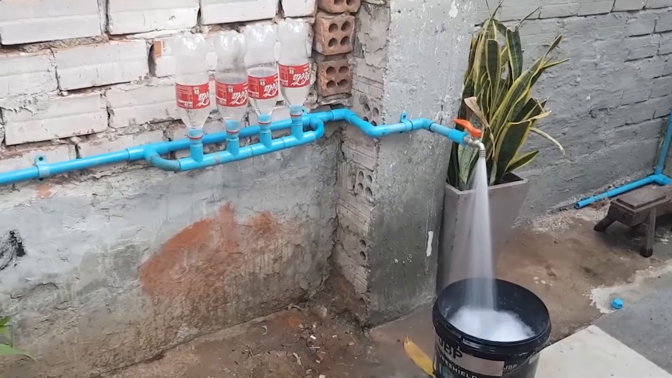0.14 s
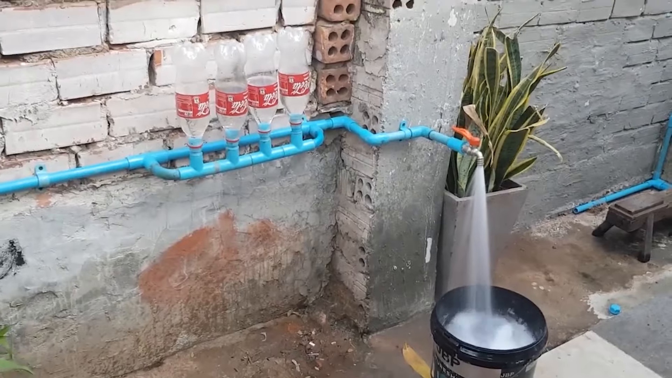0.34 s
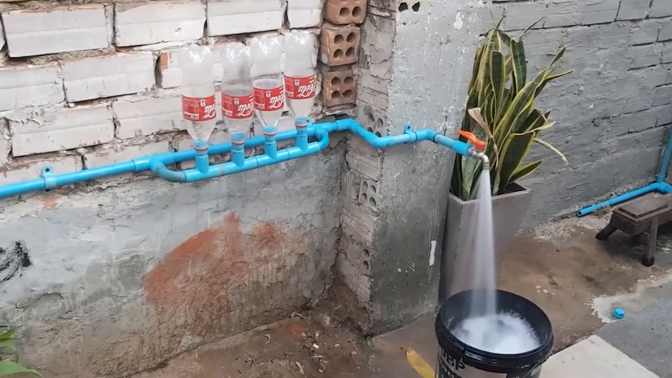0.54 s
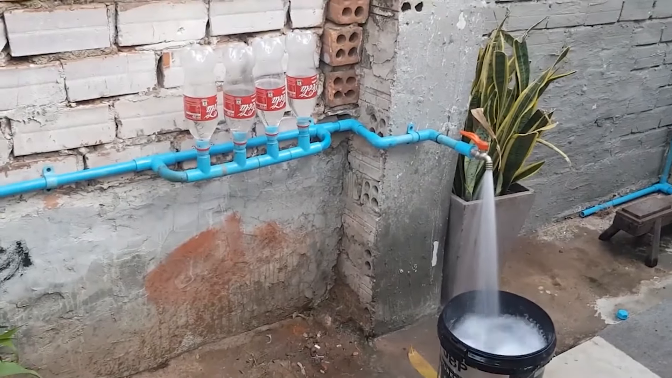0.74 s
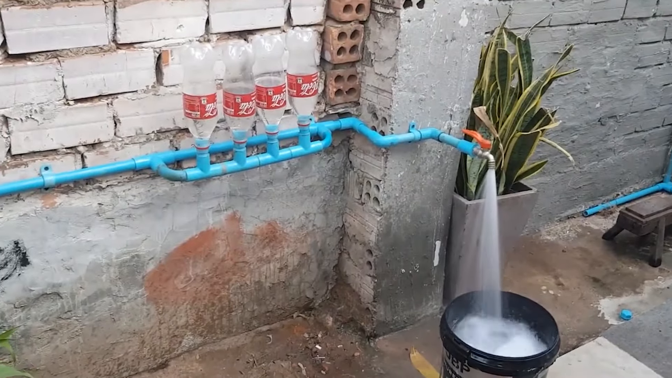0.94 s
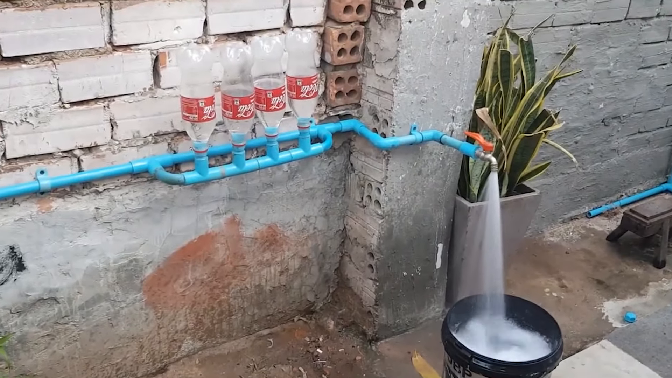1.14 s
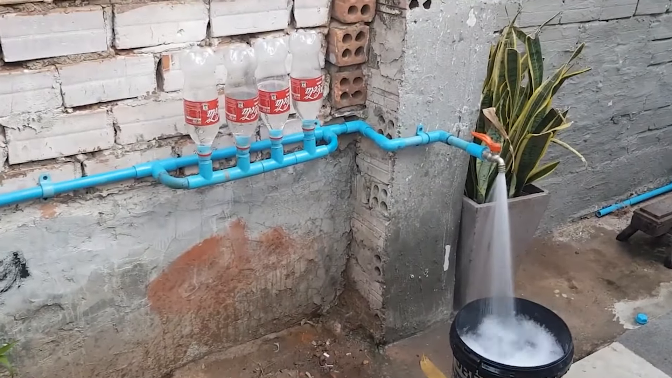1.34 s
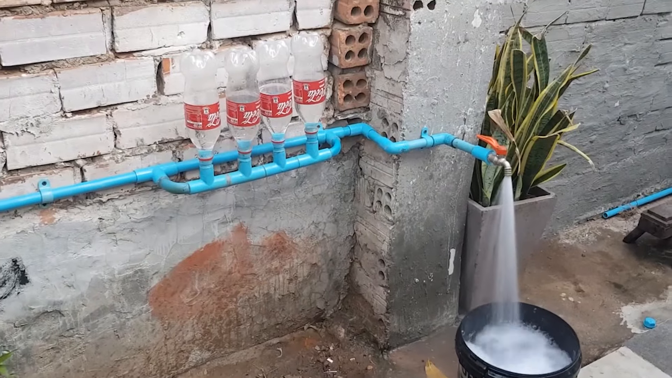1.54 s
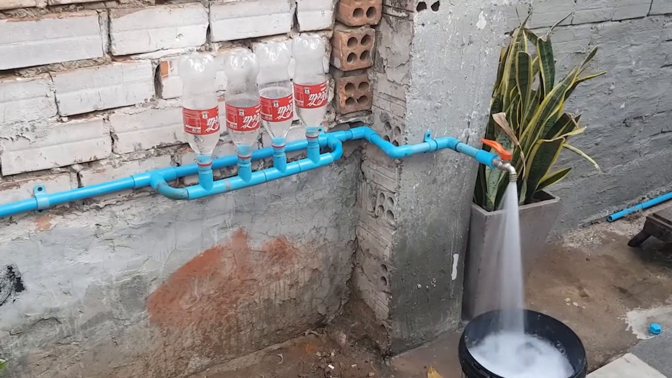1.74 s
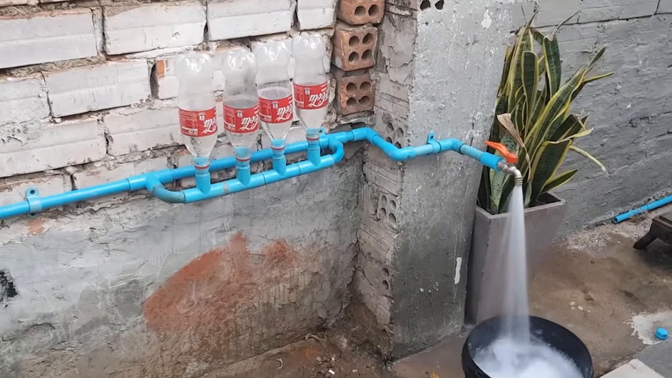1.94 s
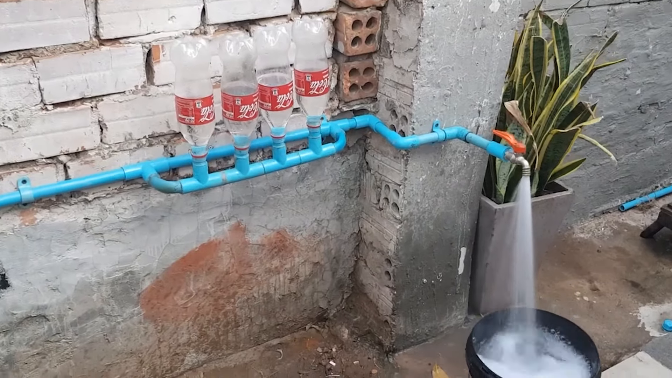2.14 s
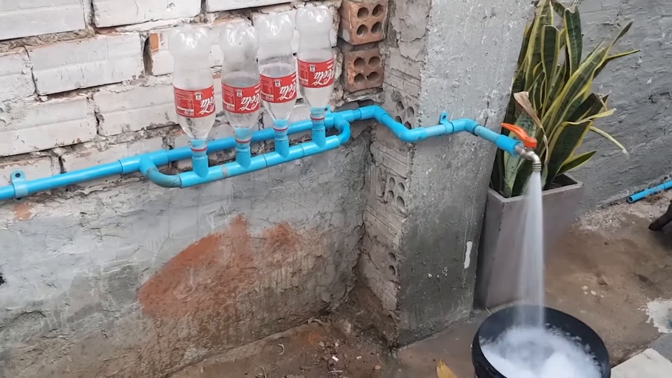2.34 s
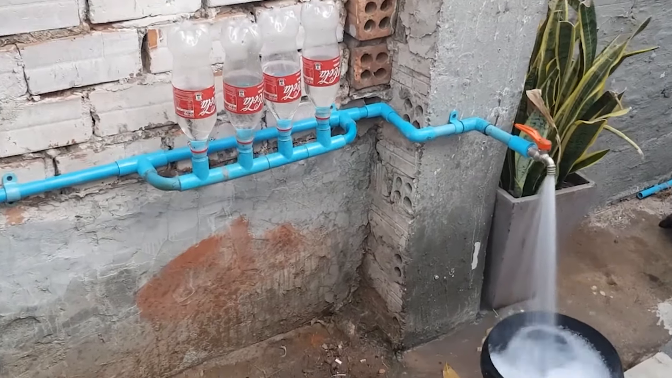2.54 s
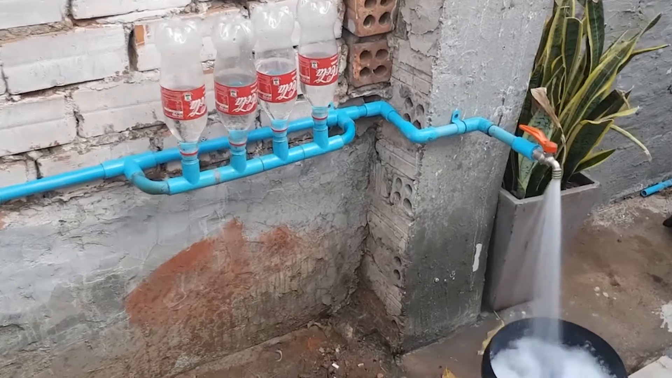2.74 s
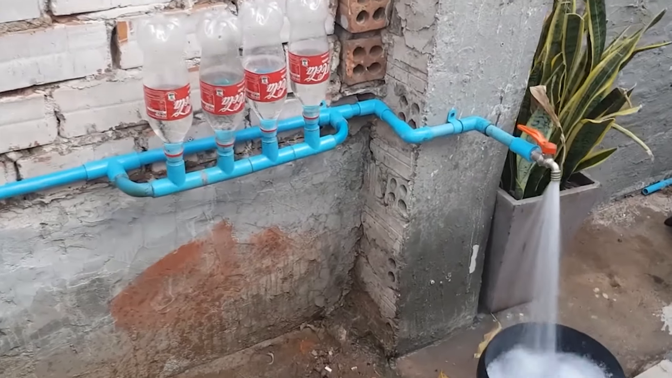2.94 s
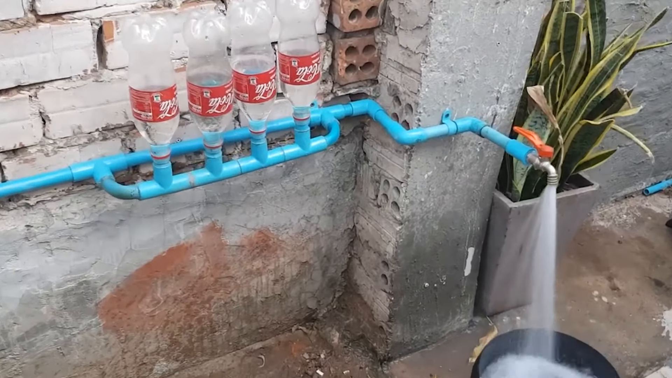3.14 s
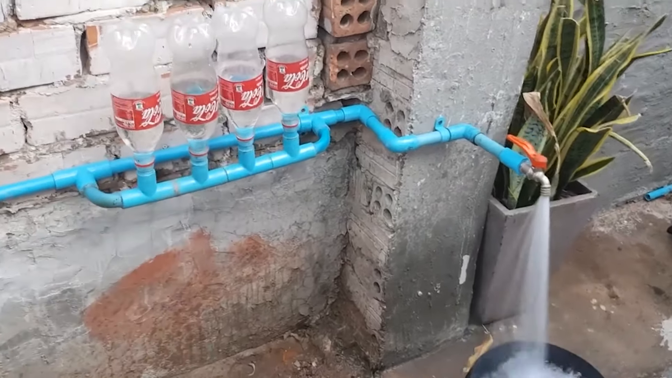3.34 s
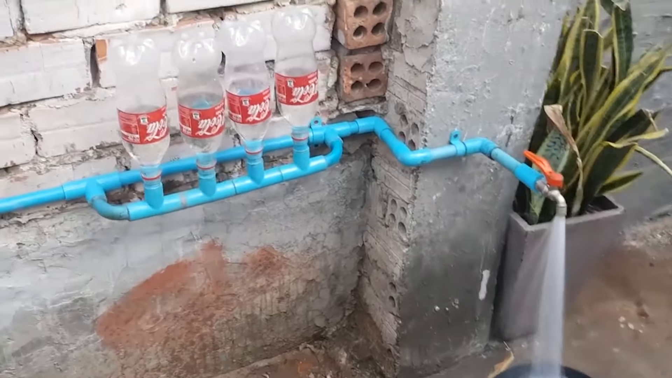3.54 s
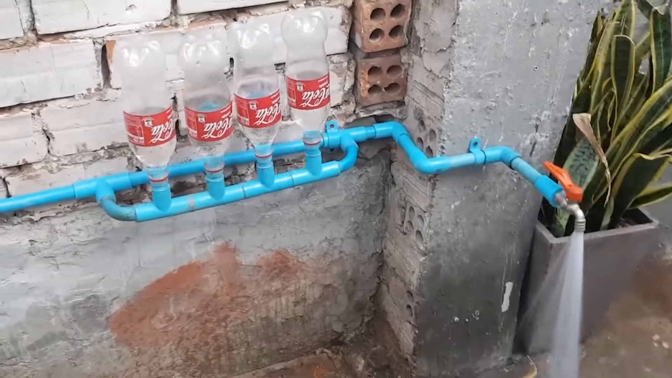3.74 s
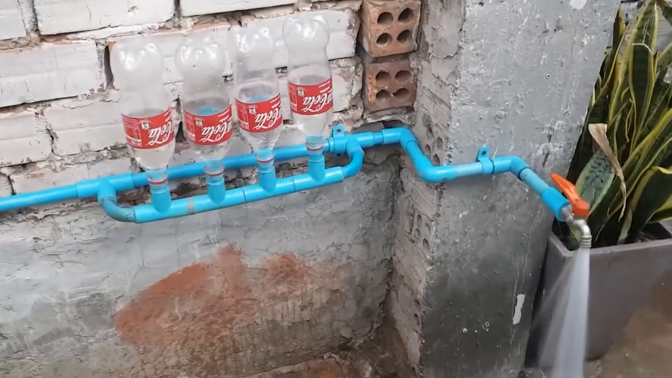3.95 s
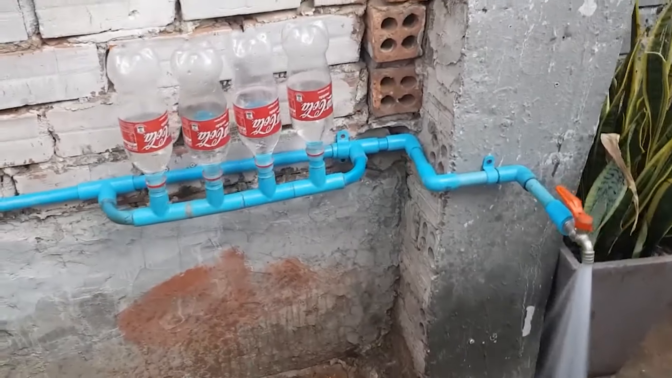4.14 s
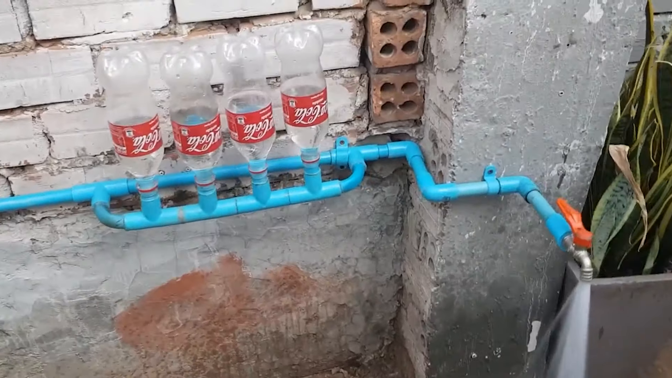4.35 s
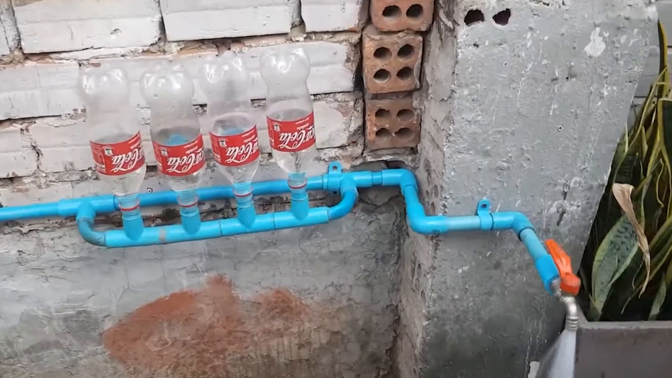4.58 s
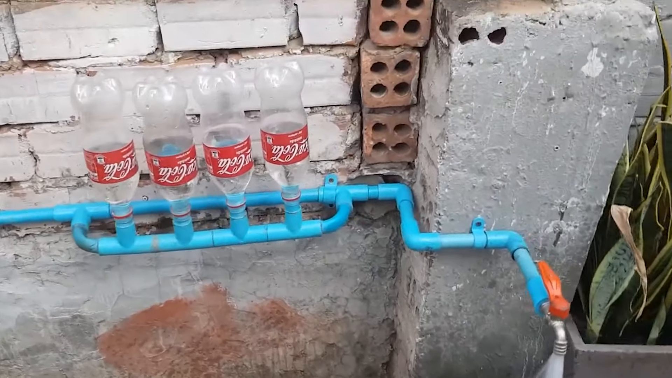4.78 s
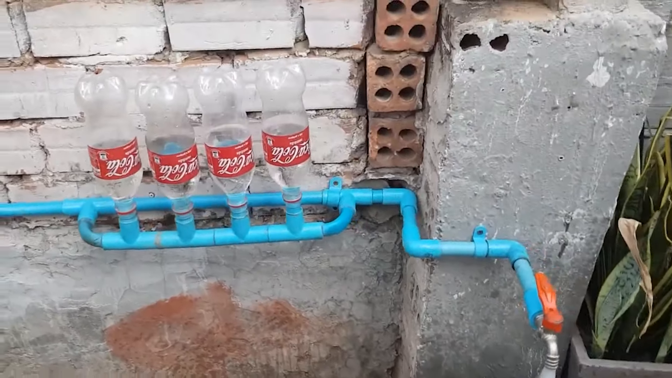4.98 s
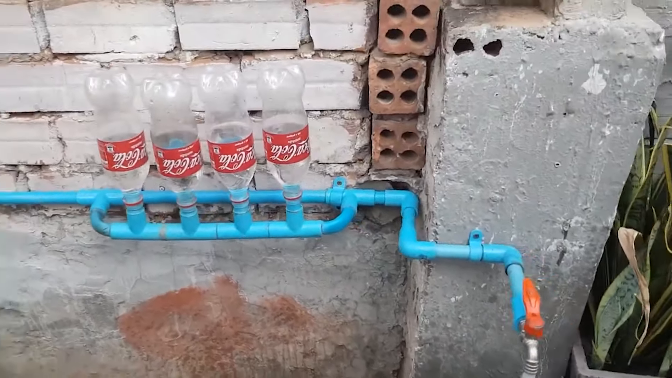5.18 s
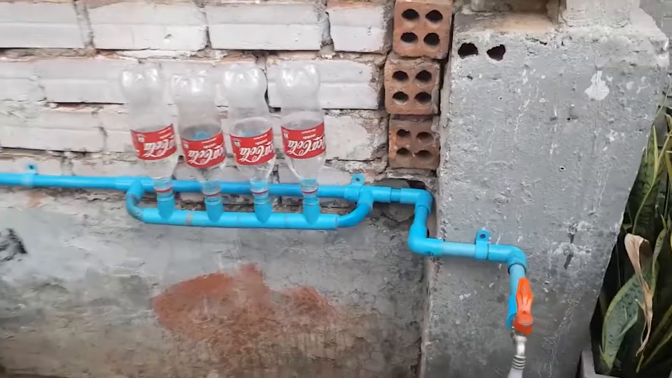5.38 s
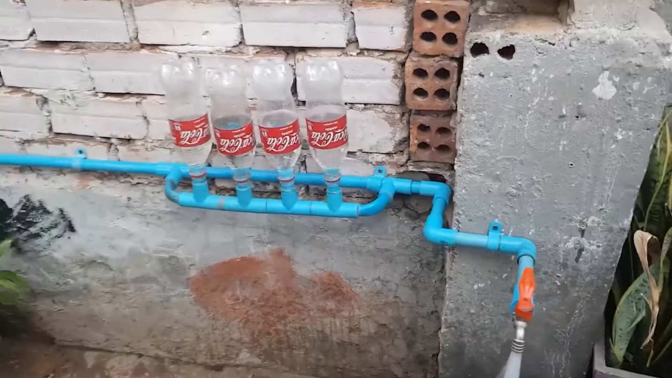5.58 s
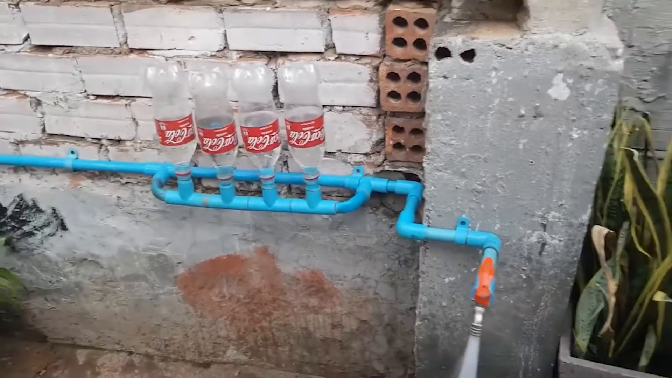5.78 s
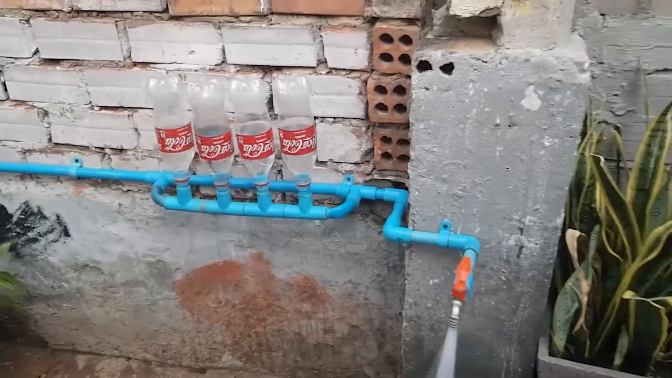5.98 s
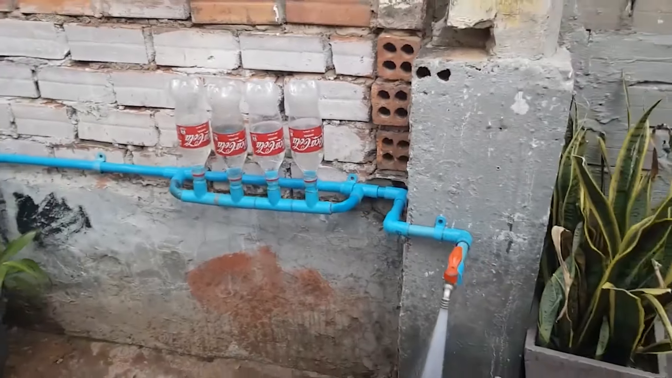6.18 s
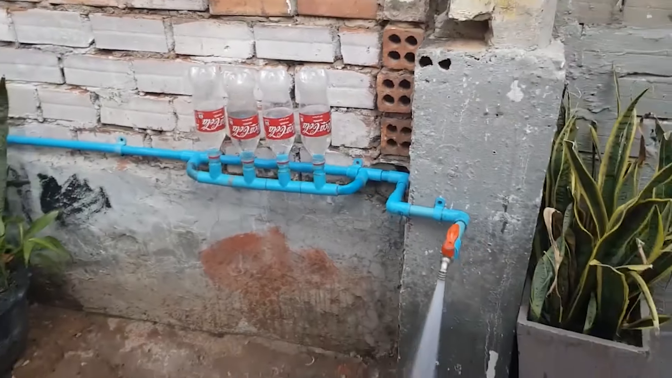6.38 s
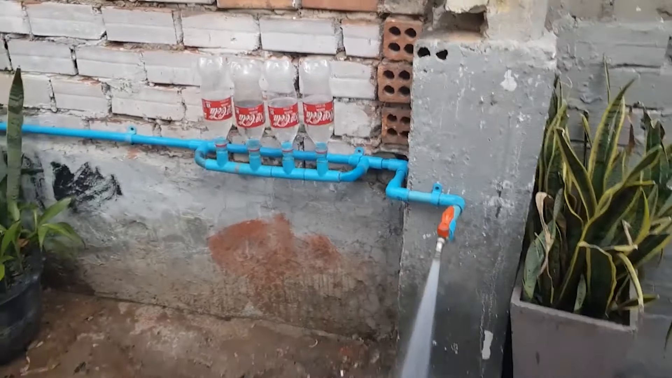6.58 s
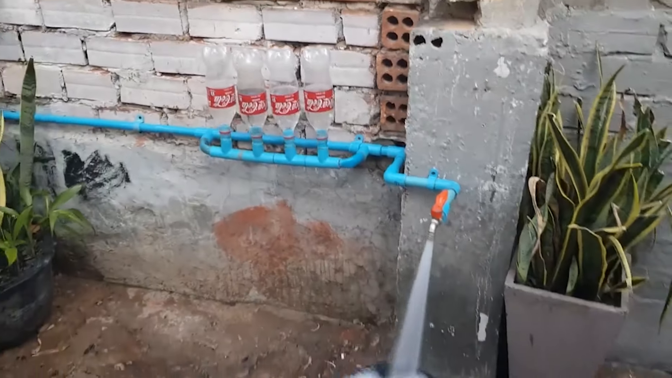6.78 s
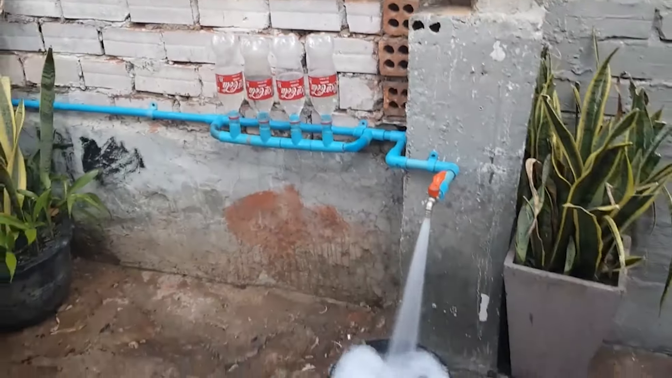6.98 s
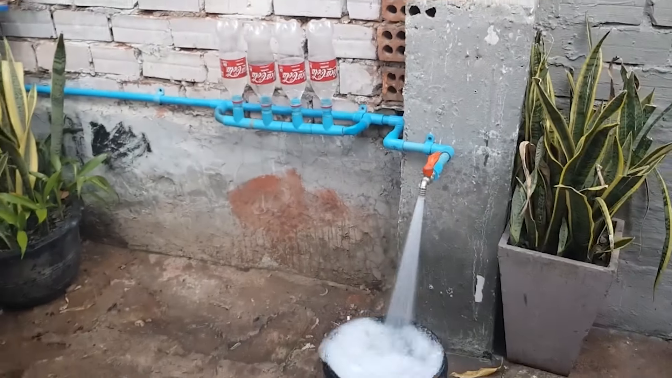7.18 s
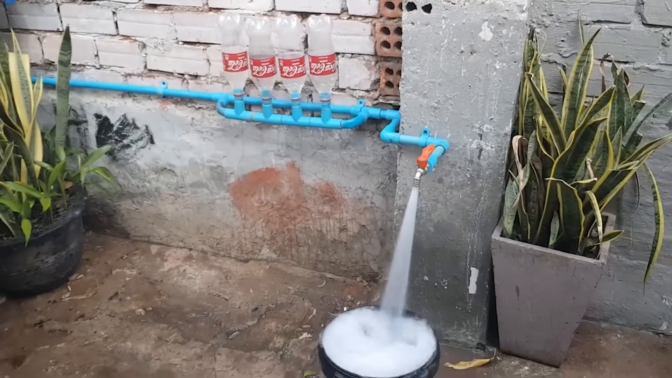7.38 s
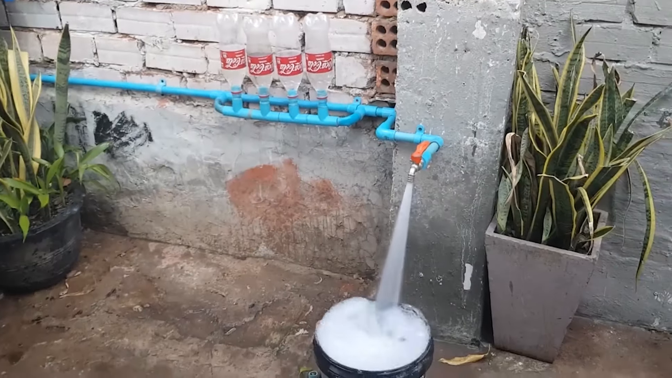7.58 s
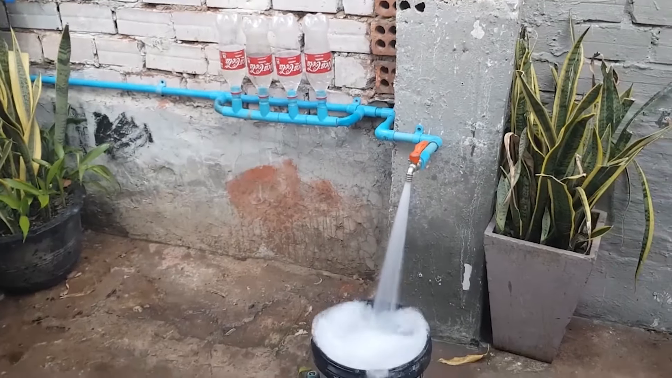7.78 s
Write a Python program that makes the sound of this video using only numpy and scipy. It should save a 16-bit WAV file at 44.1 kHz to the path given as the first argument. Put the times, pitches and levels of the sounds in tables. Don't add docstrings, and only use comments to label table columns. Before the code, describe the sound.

Dense, unbroken rush of water plunging into a frothy bucket beside brick walls, bubbling underneath and hissing on top, as the handheld microphone drifts past.

```python
import sys
import numpy as np
from scipy import signal
from scipy.fft import irfft, next_fast_len
from scipy.io import wavfile
from scipy.ndimage import uniform_filter1d

SR = 44100
rng = np.random.default_rng(int(sys.argv[2]) if len(sys.argv) > 2 else 0)


def inscribe(sig):
    pcm = np.round(np.clip(np.atleast_2d(sig).T, -1, 1) * 32767)
    wavfile.write(sys.argv[1], SR, pcm.astype(np.int16))


def gain_from_decibels(decibels):
    exponent = np.asarray(decibels, float) / 20
    return 10 ** exponent


N = 344862
FRAME, HOP = 2048, 512


def evened(x):
    return x / np.sqrt(np.mean(abs(x) ** 2) + 1e-20)


def read(points, hz):
    f, value = np.transpose(points)
    return np.interp(np.log(hz + 1), np.log(f + 1), value)


def follow(rows, t):
    s, *columns = np.transpose(rows)
    return [np.interp(t, s, c) for c in columns]


def passing(t, s, length, away, best):
    return away + (best - away) * np.exp(-((t - s) / length) ** 2)


def chance(top_hz):
    size = next_fast_len(N)
    hz = np.fft.rfftfreq(size, 1 / SR)
    shape = np.exp(-hz / top_hz) / np.sqrt(hz + 4) * (hz > 2)
    phase = 2 * np.pi * rng.random(len(hz))
    return evened(irfft(shape * np.exp(1j * phase), size)[:N])


def bubbles(low_hz, high_hz, per_cycle, cycles, spread_db, count):
    out = np.zeros(N)
    for hz in np.geomspace(low_hz, high_hz, count):
        u = np.arange(int(cycles * SR / hz)) * hz / SR
        tone = np.sin(2 * np.pi * u * (1 + 0.075 * u / cycles))
        ring = tone * np.exp(-4 * u / cycles) * (1 - np.exp(-2 * u))
        ring *= np.sqrt(hz) / np.linalg.norm(ring)
        born, size = rng.random((2, N))
        train = (born < per_cycle * hz / SR) * gain_from_decibels(-spread_db * np.log(size + .01))
        out += signal.oaconvolve(train - train.mean(), ring / train.std())[:N]
    return evened(out)


def frames(x):
    z = signal.stft(x, SR, nperseg=FRAME, noverlap=FRAME - HOP)[2]
    power = np.mean(abs(z) ** 2, axis=1)
    return z / np.sqrt(uniform_filter1d(power, size=9))[:, None]


def water(surge_db, share, *grain, count):
    rushes = rng.standard_normal((3, N))
    fizz = bubbles(*grain, count=count)
    streams = []
    for k, rush in enumerate(rushes):
        stream = np.sqrt(share) * np.roll(fizz, k * N // 3) + np.sqrt(1 - share) * rush
        streams.append(frames(gain_from_decibels(surge_db) * stream))
    return streams


# (frequency [Hz], level [dB per Hz])
PLUNGE_COLOUR = [(40, -3), (70, -6.5), (110, -7), (220, -4), (320, 0), (450, -6.5), (550, -2), (620, 2.5),
                 (850, 0.5), (1000, 0.5), (1300, -1.5), (2000, -2), (3000, -3), (4500, -13)]
# (frequency [Hz], width [Hz], level [dB])
BUCKET_RINGS = [
    (161, 26, 9),
    (361, 28, 7),
    (526, 26, 7),
    (706, 36, 7),
    (1420, 420, -5),
    (3900, 1000, -2),
]
# (best time [s], length [s], share away [ratio], share at best [ratio])
RING_SWELLS = [
    (3.7, 1.6, .8, 1.7),
    (1.2, 2.37, 0.34, 1.2),
    (4.2, 1, 0.23, 2.03),
    (1.6, 2.7, 0.16, 1.1),
    (1.0, 3, 0.01, 1.2),
    (2.4, 2, -.3, .8),
]


def plunge_level(hz, t, near_db, mist_db, hidden):
    rings_db = 0
    for (f, width, db), swell in zip(BUCKET_RINGS, RING_SWELLS):
        rings_db = rings_db + passing(t, *swell) * db / (1 + (2 * (hz - f) / width) ** 2)
    roar_db = 0.77 * mist_db + 0.32 * hidden - 0.95
    boom_db = -2.5 * (near_db + mist_db + 27.5)
    low = np.clip((200 - hz) / 80, 0, 1)
    return gain_from_decibels(read(PLUNGE_COLOUR, hz) + rings_db + near_db + roar_db + low * boom_db - 27.0)


def mist_share(hz):
    return np.clip((hz - 9500) / 2500, 0, 1)


# (frequency [Hz], level [dB per Hz])
SPRAY_COLOUR = [(1500, -17.5), (3000, -14.5), (3800, -8), (5000, -4), (7500, -5), (8600, -7), (9200, -9),
                (10500, -5.5), (12000, -2), (13300, 1.5), (14500, 0.5), (15700, 1.5)]


def spray_level(hz, near_db, mist_db):
    return gain_from_decibels(read(SPRAY_COLOUR, hz) + near_db + mist_share(hz) * (mist_db - 1.0) - 26.5)


# (frequency [Hz], share [0-1])
STRAIGHT_SHARE = [(60, 0.92), (100, 0.97), (400, 0.96), (800, 0.84), (1400, 0.64), (2200, 0.38),
                  (3700, 0.46), (6000, 0.42), (9000, 0.36), (15000, 0.37)]


def straight_share(hz, hidden):
    blocking = np.clip(1.6 - hz / 4000, .4, 1)
    return np.clip(read(STRAIGHT_SHARE, hz), 0, 1) ** (1 + (hidden - 1) * blocking)


ECHO_FADE_HZ = 2280


def echo(stretches, hz, t):
    out = np.zeros((len(hz), len(t)), complex)
    hz = hz[hz < 3 * ECHO_FADE_HZ][:, None]
    turn_s = 0.14
    for start, end, first_ms, last_ms, strength in stretches:
        share = strength * (np.tanh((t - start) / turn_s) - np.tanh((t - end) / turn_s)) / 2
        on = abs(share) > 1e-3
        delay_s = np.interp(t[on], [start, end], [first_ms, last_ms]) / 1000
        out[:len(hz), on] += share[on] * np.exp(-2j * np.pi * hz * delay_s)
    return out


# (start [s], end [s], first delay [ms], last delay [ms], strength [ratio])
SURFACES = [
    [(.15, 2.53, 1.03, 1.24, .56), (2.55, 4.1, 1.4, 1.35, 0.53), (4.1, 5.51, 1, 1.04, .66),
     (5.5, 6.2, 1.05, 1.1, 0.54), (6.15, 7.9, 1.34, 1.42, .78)],
    [(-.5, 1.65, 1.35, 1.58, .38), (1.75, 2.93, 1.9, 1.93, -.5), (2.93, 4.13, 2.2, 2.46, 0.45),
     (4.1, 6.23, 2.27, 2.32, 0.68), (6.43, 7.25, 2.36, 2.47, .27)],
    [(1.3, 2.55, 2.95, 2.5, 0.19), (3.2, 4.15, 2.73, 2.75, -.28), (5.3, 8.3, 2.81, 3.2, -0.19)],
    [(-.5, 1.84, 1.22, 1.53, -.55), (1.75, 2.93, 1.4, 2.02, .46), (3.05, 3.8, 1.95, 1.65, -0.23),
     (4.2, 5.9, 1.56, 1.67, 0.35), (6.05, 7.9, 1.52, 1.76, -0.56)],
]
SURFACE_SIDES = (.25, .13, .17, -.67)


def paths(hz, t, lag):
    surfaces = [echo(stretches, hz, t) for stretches in SURFACES]
    ways = []
    for side in (1, -1):
        echoes = 0
        for surface, where in zip(surfaces, SURFACE_SIDES):
            echoes = echoes + surface * np.exp(2j * np.pi * hz * side * where * lag)
        port_delay = np.exp(-1j * np.pi * hz * side * lag)
        ways.append((1 + echoes * np.exp(-(hz / ECHO_FADE_HZ) ** 2)) * port_delay)
    return ways


def scatter(shape, bins, steps):
    ripple = uniform_filter1d(rng.standard_normal((*shape, 2)), bins, axis=0)
    a, b = uniform_filter1d(ripple, steps, axis=1).T
    return evened(a + 1j * b).T


# (at centre [dB], per lag [dB per 100 microseconds], per unit of hiding [dB])
SPRAY_PAN = (1.24, -0.15, -.55)
MIST_PAN = (2.5, -2.2, -0.5)


def shading(hz, lag, hidden):
    spray_db, mist_db = (a + b * lag * 1e4 + c * hidden for a, b, c in (SPRAY_PAN, MIST_PAN))
    high = mist_share(hz)
    return np.clip(hz / 2500, 0, 1) * ((1 - high) * spray_db + high * mist_db)


# (time [s], nearness [dB], finest mist re nearness [dB])
WALK_LEVELS = [(0, -30, 0.9), (.6, -30, 1.5), (1.0, -29, 1), (1.3, -29.5, 2), (1.9, -29.5, 1.7),
               (2.25, -27.5, 0.6), (2.8, -27.4, .4), (3.5, -27.4, 0), (4.1, -27, 0.4), (4.6, -27, 1),
               (5.0, -28, 3), (5.3, -27.5, 2), (5.6, -28.5, 3.5), (5.9, -28, 1.3), (6.5, -29, 1.4),
               (7.0, -29.5, 0.8), (7.4, -30.5, 0.6), (7.82, -30.5, 1.5)]
# (time [s], delay of left port [microseconds])
PORT_LAG = [(0, 89), (1.8, 100), (3, 108), (3.7, 132), (4.5, 109), (5.1, 77), (5.7, 66), (6.1, 38),
            (7.2, 13), (7.82, 16)]
# (most at [s], length [s], in the open [exponent], hidden [exponent])
PILLAR_HIDING = (1.25, 1.78, 0.93, 3.5)


def jet():
    surge, spit = chance(top_hz=29.6), chance(top_hz=900)
    plunge = water(0.39 * surge, 0.15, 90, 4000, .2, 6.55, 0.75, count=12)
    spray = water(.3 * surge + .75 * spit, .45, 2500, 15500, .08, 4, 2.5, count=10)

    hz = np.fft.rfftfreq(FRAME, 1 / SR)[:, None]
    t = np.arange(plunge[0].shape[1]) * HOP / SR
    near_db, mist_db = follow(WALK_LEVELS, t)
    lag = follow(PORT_LAG, t)[0] * 1e-6
    hidden = passing(t, *PILLAR_HIDING)

    plunge_gain = plunge_level(hz, t, near_db, mist_db, hidden)
    spray_gain = spray_level(hz, near_db, mist_db)
    jet_itself, *strays = [plunge_gain * p + spray_gain * s for p, s in zip(plunge, spray)]
    straight = straight_share(hz, hidden)
    ripple = 0.63 / (1 + (hz / 2500) ** 2)
    pan_db = shading(hz, lag, hidden)

    ports = []
    for side, way, stray in zip((1, -1), paths(hz, t, lag), strays):
        around = np.sqrt(ripple) * scatter(way.shape, bins=3, steps=40) * jet_itself
        around += np.sqrt(1 - ripple) * stray
        heard = np.sqrt(straight) * way * jet_itself + np.sqrt(1 - straight) * around
        heard = heard * gain_from_decibels(side / 2 * pan_db)
        ports.append(signal.istft(heard, SR, nperseg=FRAME, noverlap=FRAME - HOP)[1][:N])
    return np.array(ports)


# (time [s], length [s], left level [dB], right level [dB], top frequency [Hz])
HANDLING_BUMPS = [
    (0.177, 0.019, -38, -30, 380),
    (0.217, .03, -46, -36, 250),
    (.403, .012, -36, -37, 320),
    (0.467, 0.04, -38, -38, 110),
    (1.229, 0.072, -56, -52, 100),
    (5.48, 0.075, -57, -55, 110),
    (6.145, 0.11, -51, -51, 110),
    (7.524, .05, -48, -53, 178.4),
]


def handling():
    t, out = np.arange(N) / SR, np.zeros((2, N))
    for s, length, left_db, right_db, top_hz in HANDLING_BUMPS:
        band = signal.butter(2, [45, top_hz], "band", fs=SR, output="sos")
        lumps = evened(signal.sosfilt(band, rng.standard_normal((2, N))))
        out += gain_from_decibels([[left_db], [right_db]]) * lumps * np.exp(-((t - s) / length) ** 2)
    return out


def scene():
    return jet() + handling()


def band_limit(x):
    return signal.sosfilt(signal.butter(12, 15740, fs=SR, output="sos"), x)


def record(dry):
    bass_cut = signal.butter(4, 58, "high", fs=SR, output="sos")
    mix = signal.sosfilt(bass_cut, dry)
    return band_limit(mix)


dry = scene()
out = record(dry)
inscribe(out)
```